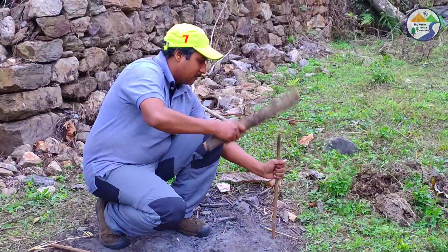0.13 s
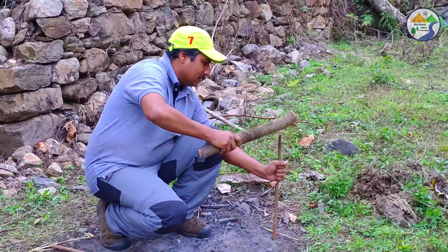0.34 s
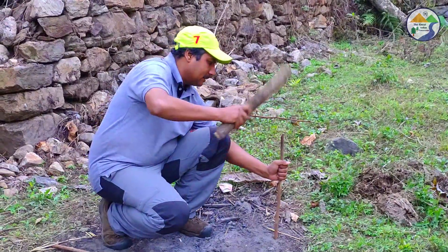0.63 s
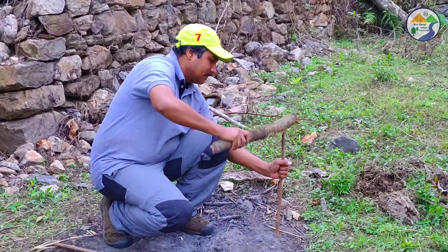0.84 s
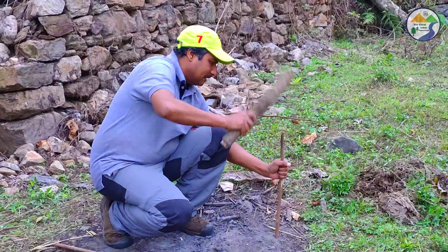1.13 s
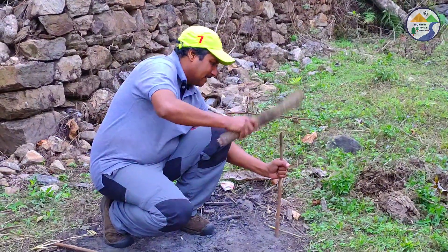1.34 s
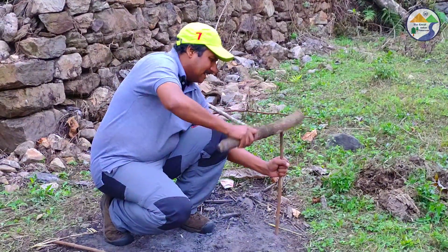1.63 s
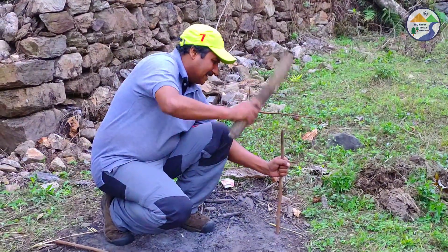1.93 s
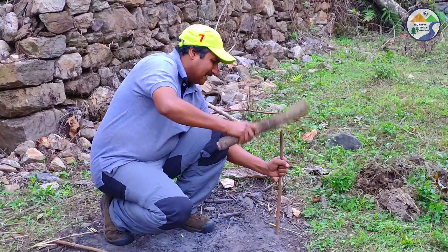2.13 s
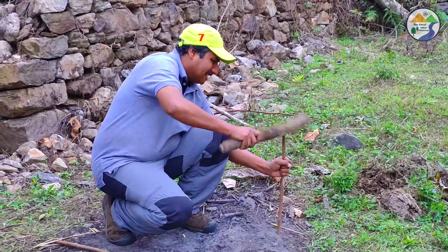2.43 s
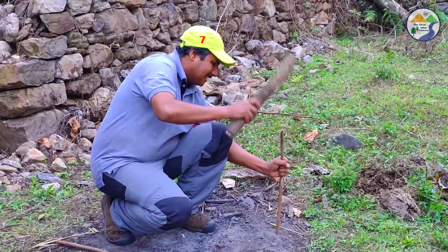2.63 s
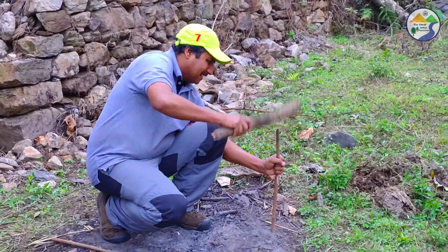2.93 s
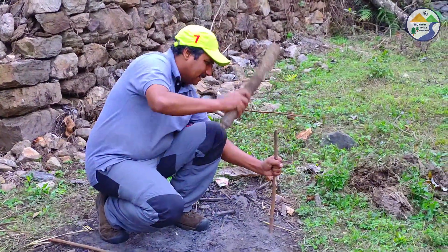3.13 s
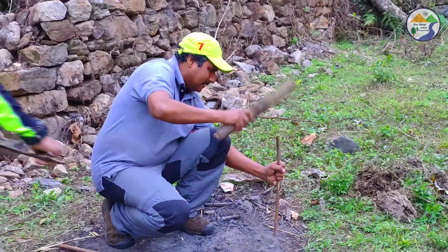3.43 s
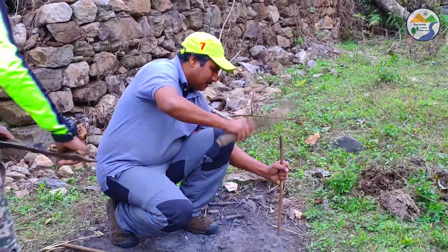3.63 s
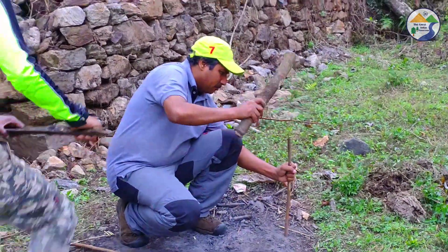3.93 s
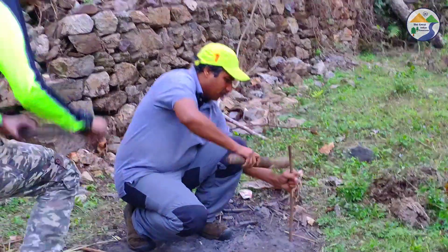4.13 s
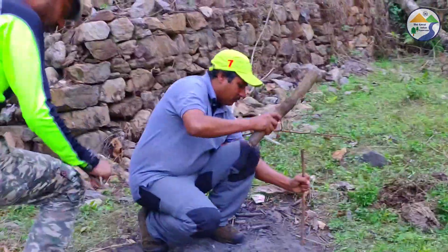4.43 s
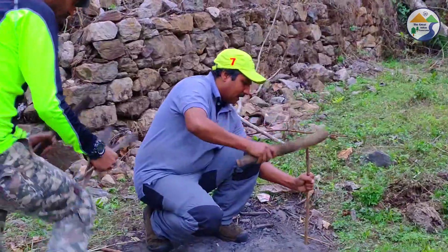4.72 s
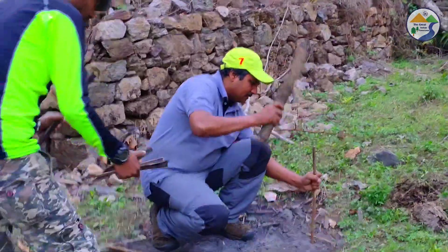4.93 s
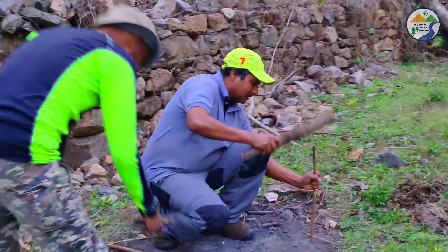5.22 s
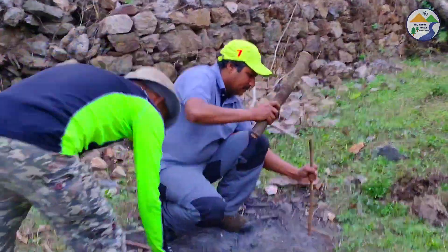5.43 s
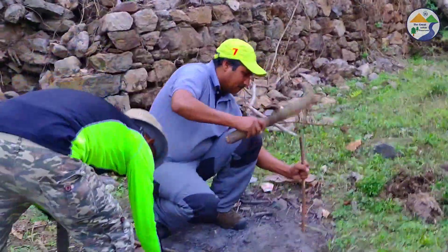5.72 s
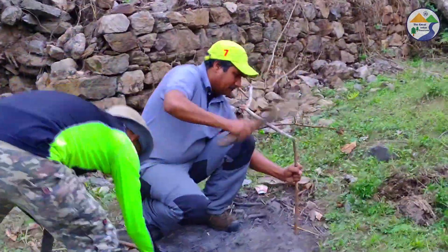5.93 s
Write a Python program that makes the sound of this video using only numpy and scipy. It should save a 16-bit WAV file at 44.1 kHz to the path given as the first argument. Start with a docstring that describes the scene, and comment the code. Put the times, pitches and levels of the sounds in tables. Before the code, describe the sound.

A wooden club raps a thin wooden stake outdoors about every 0.4 seconds, hard dry knocks with low soil thuds and one sharp stick snap.

```python
"""Driving a stake into stony ground

A wooden club strikes a thin hand-held stake outdoors, beside a dry-stone wall.
Each blow sums a noise crack at the contact, decaying modes of stake and club, and a thud of the soil.
Nearby, twigs and a stick break as tearing noise, and loose pieces knock and bounce as struck modes.
Filtered noise gives soft swishes, dull thumps and faint air; a far bird peeps in gliding sine tones.
Wall and hillside scatter the near sounds, and the loudest peaks clip."""
import sys
import numpy as np
from scipy import signal
from scipy.fft import rfft, irfft
from scipy.io import wavfile

SR = 44100
rng = np.random.default_rng(int(sys.argv[2]) if len(sys.argv) > 2 else 0)


def inscribe(sig):
    """Save sig as 16-bit PCM at rate SR to the path in sys.argv[1].

    A 1-D sig is mono; a 2-D sig holds one channel per row.
    Samples are clipped to [-1, 1] before scaling.
    """
    pcm = np.round(np.clip(np.atleast_2d(sig).T, -1, 1) * 32767)
    wavfile.write(sys.argv[1], SR, pcm.astype(np.int16))


N = 267246
T = np.arange(int(0.4 * SR)) / SR  # time base of one event [s]

# Club blows: t/s, stake level/dB, soil level/dB, club level/dB, stake bending level/dB, f muffled by the grip/Hz
BLOWS = [(0.7758, -6.5, -21.5, -8.5, -35.5, 2040), (1.1705, -5.5, -22.5, -9, -36, 1570),
         (1.5834, -3.5, -19.5, -18, -33.5, 1180), (1.987, -5, -19.5, -10.5, -40, 1250),
         (2.3823, -4.5, -18, -10.5, -40, 1070), (2.7884, -5.5, -20, -10.5, -51.5, 1020),
         (3.2031, -5.5, -18, -7, -45, 785), (3.6327, -5.5, -19.5, -8, -34, 1550),
         (4.0326, -1.5, -31, -16, -30, 2370), (4.6535, -14, -25, -18.5, -58.5, 2980),
         (5.0813, -3.5, -18, -7, -41, 2640), (5.506, -0.5, -27, -15, -25.5, 2870),
         (5.9435, -6, -19.5, -6.5, -27, 3000)]
# Modes of the soil round the tip: f/Hz, level/dB, t60/s
SOIL_MODES = [(49.9, -3, 0.09), (80, 3, 0.094), (115.5, 1, 0.18), (147.2, 5, 0.068), (154.8, -10, 0.2),
              (172.6, 3.5, 0.084), (195.4, -3.5, 0.12), (262.5, 11.5, 0.014)]
# Modes of the club: f/Hz, level/dB, t60/s
CLUB_MODES = [(345.8, 4.5, 0.033), (522, 11.1, 0.0087)]
# Modes of the stake, before grip and seating: f/Hz, level/dB, t60/s
STAKE_MODES = [(829, -4, 0.0097), (1314, -2.5, 0.011), (1862, -2.5, 0.028), (2243, 3, 0.011),
               (2360, -8, 0.017), (3010, -4.5, 0.017)]
# Bending modes of the stake: f/Hz, level/dB, t60/s
BENDING_MODES = [(751.5, 0.97, 0.12), (788, -0.23, 0.15)]
# Spectrum of the contact crack: f/Hz, level/dB
CRACK_SPECTRUM = [(700, -13), (1300, 10.5), (2600, 9.5), (3400, 0), (4300, -14), (6000, -8.5), (8000, -11),
                  (10200, -14), (11500, -26), (13500, -18), (16000, -33.5)]
# Spectrum of stones shifting in the soil: f/Hz, level/dB
GRAVEL_SPECTRUM = [(90, -2), (150, -1.5), (300, -5), (500, -20), (900, -28.5), (3000, -41)]
# Stake as it seats, at the first and the last blow: pitch ratio/1
STAKE_PITCH_RATIO = (0.96, 1.001)
# Likewise: spectral tilt/(dB per octave)
STAKE_TILT = (3.5, -4)
# Likewise: ring length ratio/1
STAKE_RING_RATIO = (1.02, 0.63)
# Breaking twigs: t/s, level/dB, pitch ratio/1
SNAPS = [(0.216, -48.5, 1.2), (0.226, -50.5, 0.75), (0.439, -45.5, 1.24), (.453, -46, 0.96),
         (4.072, -48, 1.4), (4.1231, -35.5, 0.94), (4.137, -46, 0.67), (4.1637, -8, 0.992),
         (4.256, -47.5, 1.16), (5.617, -52.5, 1.23), (5.922, -52, 2.1)]
# Spectrum of breaking wood, at pitch ratio 1: f/Hz, level/dB
TWIG_SPECTRUM = [(400, -17), (1200, -14), (1850, 2), (2300, -1), (3000, -9), (3770, -5), (4500, -3),
                 (5100, -15), (6200, -13), (8700, -12), (10500, -20), (12000, -27), (14000, -23),
                 (16000, -31)]
# Spectrum of flying splinters: f/Hz, level/dB
SPLINTER_SPECTRUM = [(800, -11.5), (2000, 7), (5000, -7), (10300, -1), (11500, -23), (16000, -22)]
# Knocks of loose sticks: t/s, level/dB, pitch ratio/1
TAPS = [(3.403, -32.5, .8), (3.604, -35, 1.1), (4.708, -35, 1.18), (4.997, -35.5, 0.69),
        (5.132, -39.5, 1.0), (5.8673, -21.5, 1.39), (5.8831, -18, 1.05)]
# Modes of a loose stick, at pitch and length ratio 1: f/Hz, level/dB, t60/s
STICK_MODES = [(433, 0.5, 0.0037), (705, -13, 0.075), (1097, -2.5, 0.027), (1590, -1, 0.032),
               (1850, 2, 0.028), (2160, -15.5, 0.0035), (3500, -7, 0.019), (7350, -45, 0.069),
               (8000, -12, 0.024)]
# Spectrum of grit: f/Hz, level/dB
GRIT_SPECTRUM = [(500, 2), (2500, 17.5), (4800, -2), (6400, 7), (8500, -2), (10500, -27), (13000, -24),
                 (16000, -28)]
# Soft swishes, scuffs and late wash after a blow: t/s, length/s, centre f/Hz, level before the swell/dB
SWISHES = [(1.019, 0.081, 2260, -56), (1.651, 0.13, 1950, -61), (2.238, 0.18, 2120, -59.5),
           (2.418, 0.13, 1760, -51), (2.418, 0.13, 4380, -59.5), (4.977, 0.065, 1310, -50.5),
           (5.01, 0.14, 1490, -51)]
# Soft footfalls and the low body of the loud snap: t/s, centre f/Hz, level before decay and softening/dB
THUMPS = [(0.23, 120, -41), (0.438, 117, -35.5), (4.074, 259.5, -31), (4.165, 458, -25), (5.618, 376, -35)]
# Bird peeps: t/s, length/s, mean f/Hz, peak level/dB, glide relative to mean f/1
PEEPS = [(2.128, 0.072, 3490, -57, -0.06), (3.445, 0.073, 3040, -61.5, 0.085)]
# Spectrum scattered by the wall: f/Hz, level/dB
WALL_SPECTRUM = [(50, 21.5), (130, 4), (300, -1), (800, 2), (2000, -6), (4000, -13.5), (9000, -1.5),
                 (15000, 4.5)]
# Spectrum of the late wash from the hillside: f/Hz, level/dB
HILL_SPECTRUM = [(60, 17.5), (130, 9.5), (400, -11.5), (900, -19.5), (1500, -4.5), (1900, 0.5),
                 (2600, -2.5), (5000, -6), (9000, -7.5), (15000, 0.5)]
# Spectral density of still air: f/Hz, relative level/dB
AIR_SPECTRUM = [(22, 4), (50, 1), (92, 0), (166, -5.5), (363, -8), (1040, -17), (1890, -19.5),
                (3340, -25.5), (5430, -25.5), (6210, -28.5), (13600, -36.5), (16000, -54.5)]

SEATING_POWER = 2.7  # the ground grips little at first, then ever faster
GRAVEL_DB = -29.5
BARK_DB, BARK_PER_STAKE = -18.5, 0.96  # crack at a usual blow; dB per dB of stake level
TEAR_MS = 2.66  # rise time
# The last fibres: spacing, level of the first against the break, loss from one to the next
FIBRE_GAP_S, FIBRE_DB, FIBRE_LOSS_DB = 0.017, -26, 7.5
# Bounces: spacing for the hardest knock, its growth in dB per dB of knock, loss per bounce
BOUNCE_S, BOUNCE_GROWTH, BOUNCE_LOSS_DB = 0.0098, 0.74, 8
GRIT_DB, GRIT_GROWTH = -25, 1.38  # at the hardest knock; dB per dB of contact
AIR_DB = -52
BIAS, CUTOFF_HZ = -0.0077, 16300  # bias relative to full scale


def hammering(crack_t60=0.02, echo_db=-12.5, echo_ms=4.47, gravel_t60=0.224,
              hardness=1.0, sharpening_db=4.0):
    """Impact excitation: the bark cracks, stake and club ring in their modes, and the soil takes the push."""
    out = np.zeros(N)
    usual_stake_db = np.mean(BLOWS, axis=0)[1]
    seating = np.linspace(0, 1, len(BLOWS)) ** SEATING_POWER
    for seated, (s, stake_db, soil_db, club_db, bend_db, muffled_hz) in zip(seating, BLOWS):
        # a firmer seat makes the stake ring higher, duller and shorter
        pitch = np.interp(seated, [0, 1], STAKE_PITCH_RATIO)
        tilt_db = np.interp(seated, [0, 1], STAKE_TILT)
        length = np.interp(seated, [0, 1], STAKE_RING_RATIO)

        # stones shifting round the tip make the thud uneven
        gravel = from_db(GRAVEL_DB) * noise(GRAVEL_SPECTRUM, len(T)) * decay(T, gravel_t60)
        soil = soften(from_db(soil_db) * ring(SOIL_MODES) + gravel, contact_ms=0.27)
        club = from_db(club_db) * soften(ring(CLUB_MODES), contact_ms=0.75)
        held_modes = gripped(STAKE_MODES, muffled_hz)
        stake = from_db(stake_db) * ring(held_modes, pitch, tilt_db, length)
        # off-centre blows set the stake bending, which rings longer
        bending = from_db(bend_db) * ring(BENDING_MODES)
        stake_sound = soften(stake + bending, contact_ms=0.28)

        # a harder blow cracks louder; past the usual strength also brighter, with a weaker echo
        harder_db = BARK_PER_STAKE * (stake_db - usual_stake_db)
        excess_db = max(harder_db, 0)
        # the crack returns faintly from the ground a few milliseconds later
        ground_echo = from_db(echo_db - sharpening_db * excess_db) * burst(echo_ms) ** 8
        contact = decay(T, crack_t60) + ground_echo
        crack_noise = noise(CRACK_SPECTRUM, len(T), tilt_db=hardness * excess_db)
        crack = from_db(BARK_DB + harder_db) * crack_noise * contact

        # the club is pushed the opposite way to stake and soil
        add(out, s, soil - club + stake_sound + crack)
    return out


def twigs(splinter_db=-28.0, splinter_t60=0.22):
    """Brittle fracture: fibres tear in a rush of milliseconds, splinters fizz on and the last fibres part."""
    out = np.zeros(N)
    for s, db, pitch in SNAPS:
        splinters = from_db(splinter_db) * decay(T, splinter_t60) * noise(SPLINTER_SPECTRUM, len(T))
        add(out, s, from_db(db) * (tear(pitch) + splinters))
        for at, fall_db in dying_run(s + FIBRE_GAP_S, FIBRE_GAP_S, FIBRE_LOSS_DB, count=5):
            add(out, at, from_db(db + FIBRE_DB + fall_db) * tear(pitch))
    return out


def tear(pitch):
    """Many small fractures overlap into a short swell of wood-coloured noise."""
    return burst(TEAR_MS) ** 2 * noise(TWIG_SPECTRUM, len(T), pitch)


def sticks(grit_t60=0.025, ring_growth=0.33):
    """Repeated impact: loose sticks bounce twice on gritty ground, which damps light knocks sooner."""
    out = np.zeros(N)
    hardest_db = np.max(TAPS, axis=0)[1]
    for s, db, pitch in TAPS:
        # a harder knock bounces for longer and scrapes more grit
        gap_s = BOUNCE_S * from_db(BOUNCE_GROWTH * (db - hardest_db))
        length = from_db(ring_growth * (db - hardest_db))
        for at, fall_db in dying_run(s, gap_s, BOUNCE_LOSS_DB, count=3):
            contact_db = db + fall_db
            grit_db = GRIT_DB + GRIT_GROWTH * (contact_db - hardest_db)
            grit = from_db(grit_db) * noise(GRIT_SPECTRUM, len(T)) * decay(T, grit_t60)
            knock = soften(ring(STICK_MODES, pitch, length=length), contact_ms=0.23)
            add(out, at, from_db(contact_db) * knock + grit)
    return out


def swishes():
    """Amplitude shaping: soft swells of band-limited noise."""
    out = np.zeros(N)
    for s, length, hz, db in SWISHES:
        size = min(int(length * SR), len(T))
        add(out, s, from_db(db) * np.hanning(size) * octave_noise(hz, size))
    return out


def thumps(thump_cycles=20.0):
    """Damped impact: a dull thump of noise falls 60 dB in a fixed number of cycles."""
    out = np.zeros(N)
    for s, hz, db in THUMPS:
        thump = octave_noise(hz, len(T)) * decay(T, thump_cycles / hz)
        add(out, s, from_db(db) * soften(thump, contact_ms=0.78))
    return out


def bird():
    """Frequency modulation: each peep is a sine whose phase sums a linearly gliding frequency."""
    out = np.zeros(N)
    for s, length, hz, db, glide in PEEPS:
        size = int(length * SR)
        pitch = hz * (1 + glide * np.linspace(-0.5, 0.5, size))
        whistle = np.sin(2 * np.pi * np.cumsum(pitch) / SR)
        add(out, s, from_db(db) * np.hanning(size) * whistle)
    return out


def outdoors(x, wall_db=-21.5, wall_t60=0.12, hill_db=-37.0, hill_ms=69.0):
    """Diffuse reflection: the rough wall scatters sound at once, the hillside returns a faint late wash."""
    wall_envelope = decay(T, wall_t60) * (1 - decay(T, 0.015))
    wall = from_db(wall_db) * rms_one(noise(WALL_SPECTRUM, len(T)) * wall_envelope)
    hill = from_db(hill_db) * rms_one(noise(HILL_SPECTRUM, len(T)) * burst(hill_ms) ** 2)
    response = (wall + hill) / np.sqrt(len(T))
    return signal.fftconvolve(x, response)[:N]


def still_air():
    """Stationary random pressure: a steady noise, strongest in the bass."""
    return from_db(AIR_DB) * noise(AIR_SPECTRUM, N)


def ring(modes, pitch=1, tilt_db=0, length=1):
    """Modal superposition: damped cosines of alternating sign, tilted about their mean pitch."""
    hz, db, t60 = np.transpose(modes)[:, :, None]
    octaves = np.log2(hz) - np.log2(hz).mean()
    # the strengths vary a little from strike to strike
    gain = from_db(db + tilt_db * octaves + rng.standard_normal(hz.shape))
    sign = (-1) ** np.arange(len(modes))
    return sign @ (gain * np.cos(2 * np.pi * hz * pitch * T) * decay(T, t60 * length))


def gripped(modes, muffled_hz, depth_db=10.0, width_octaves=0.2):
    """Local damping: the hand muffles those modes that swing most where it holds the stake."""
    hz, db, t60 = np.transpose(modes)
    nearness = np.exp(-(np.log2(hz / muffled_hz) / width_octaves) ** 2)
    return np.column_stack([hz, db - depth_db * nearness, t60])


def soften(sound, contact_ms):
    """Finite contact time: the longer the force swells and fades, the duller the sound."""
    force = T * np.exp(-4 * T * 1000 / contact_ms)  # peaks at a quarter of contact_ms
    return signal.fftconvolve(sound, force / force.sum())[:len(T)]


def dying_run(s, gap_s, loss_db, count):
    """Energy loss per contact: times and relative levels of an uneven run, each weaker than the last."""
    k = np.arange(count)
    times = s + gap_s * k * rng.uniform(0.9, 1.1, count)
    return zip(times, -loss_db * k)


def burst(rise_ms):
    """Swell and release: an envelope that rises to 1 in the given time and dies away."""
    u = T * 1000 / rise_ms
    return u * np.exp(1 - u)


def decay(t, t60):
    """Exponential damping: a fall of 60 dB in t60."""
    return np.exp(-np.log(1000) * t / t60)


def noise(spectrum, size, pitch=1, tilt_db=0):
    """Spectral shaping: noise of rms 1, coloured, shifted by a pitch ratio, tilted in dB per octave."""
    hz, db = np.transpose(spectrum)
    f = np.maximum(np.fft.rfftfreq(size, 1 / SR), 1) / pitch
    level_db = np.interp(np.log(f), np.log(hz), db + tilt_db * np.log2(hz))
    bass_cut = np.minimum(f / hz[0], 1) ** 2  # below the first listed frequency
    gain = from_db(level_db) * bass_cut
    return rms_one(irfft(rfft(rng.standard_normal(size)) * gain, size))


def octave_noise(hz, size):
    """Band limiting: noise one octave wide, scaled to rms 1 over the full time base."""
    edges = [hz / np.sqrt(2), hz * np.sqrt(2)]
    band = signal.butter(2, edges, "band", fs=SR, output="sos")
    return rms_one(signal.sosfilt(band, rng.standard_normal(len(T))))[-size:]


def from_db(db):
    """Logarithmic level: decibels to amplitude gain."""
    return 10 ** (np.asarray(db) / 20)


def rms_one(x):
    """Effective value: scale to rms 1."""
    return x / np.sqrt(np.mean(x ** 2) + 1e-20)


def add(out, s, sound):
    """Linear superposition: mix a sound in at a time in seconds."""
    at = round(s * SR)
    out[at:at + len(sound)] += sound[:N - at]


def scene():
    """Superposition of all sources, the reflections of the near ones, and the still air."""
    near = hammering() + twigs() + sticks()
    return (near + outdoors(near) + swishes() + thumps() + bird() + still_air())[None]


def record(dry):
    """Limited range and bandwidth: a small bias, clipped peaks, then a steep low-pass filter."""
    clipped = np.clip(dry + BIAS, -1, 1)
    low_pass = signal.cheby2(14, 60, CUTOFF_HZ + 800, fs=SR, output="sos")  # 60 dB down 800 Hz above
    return signal.sosfilt(low_pass, clipped)


dry = scene()
out = record(dry)
inscribe(out)
```